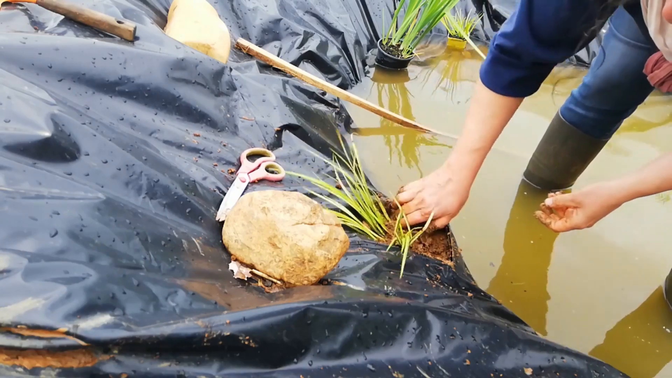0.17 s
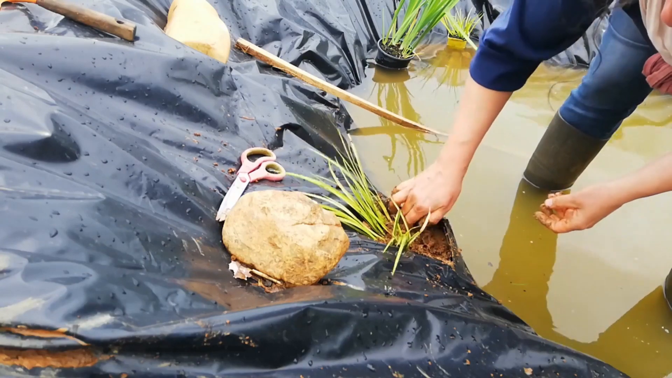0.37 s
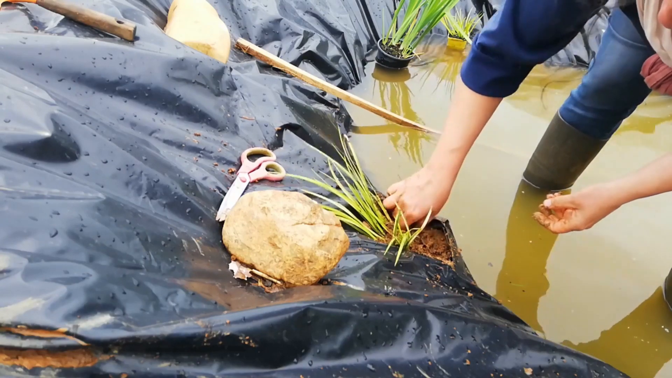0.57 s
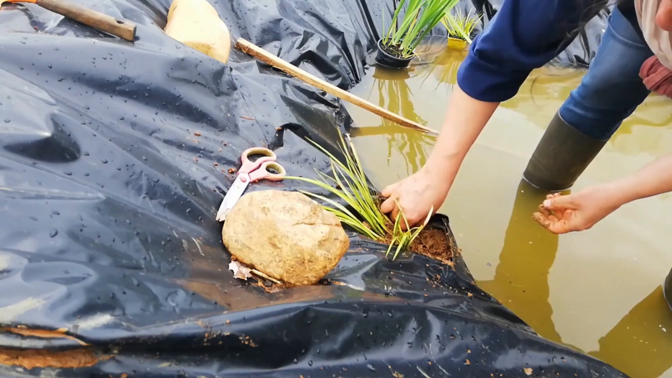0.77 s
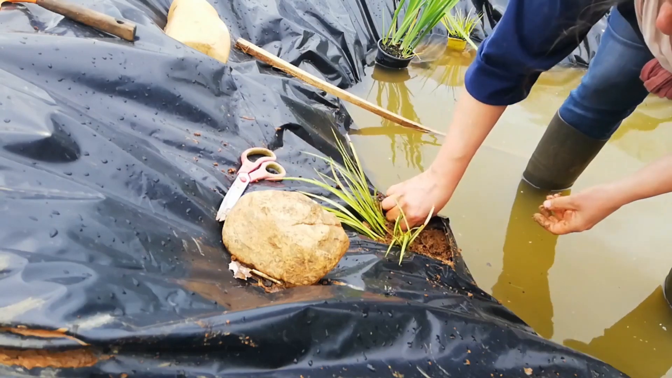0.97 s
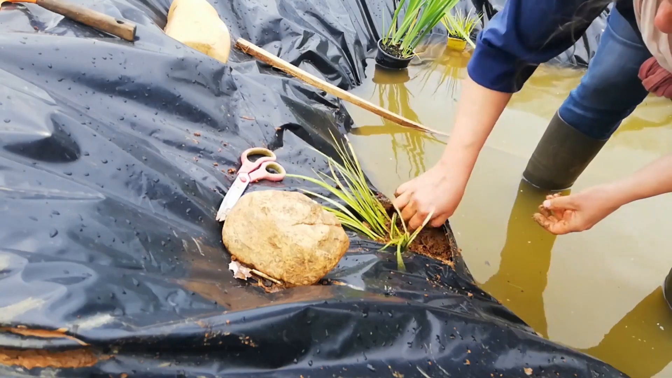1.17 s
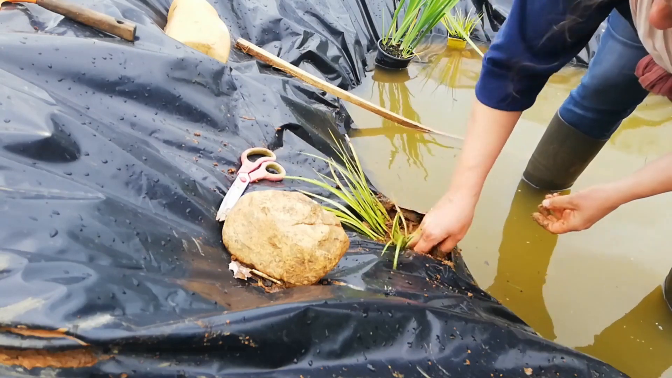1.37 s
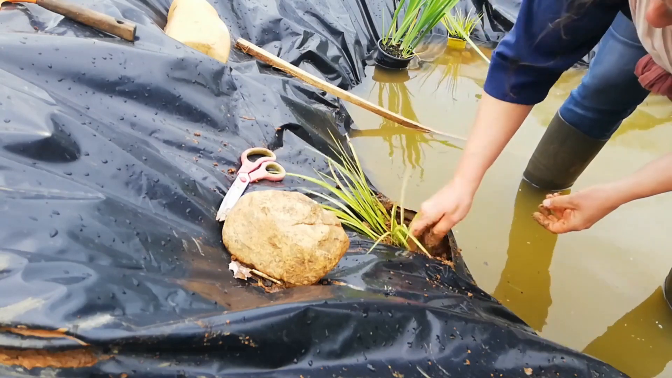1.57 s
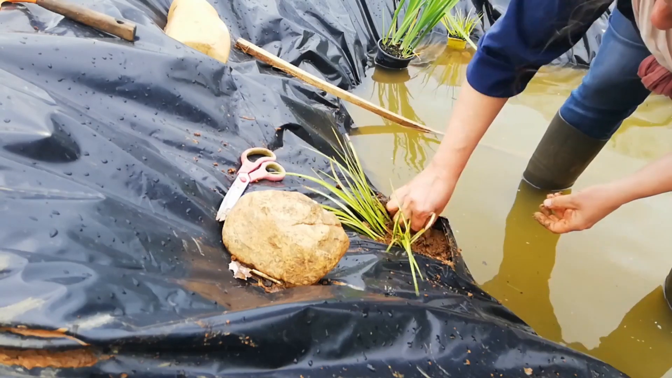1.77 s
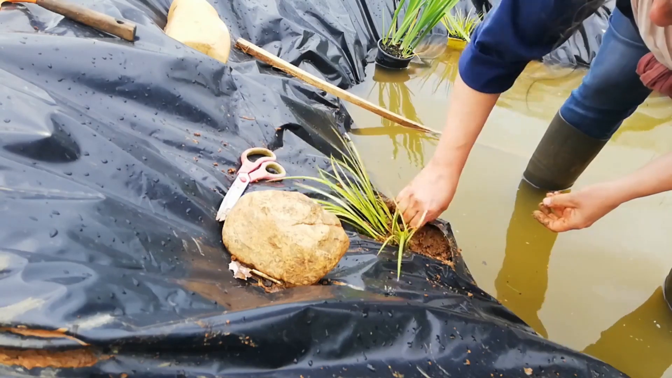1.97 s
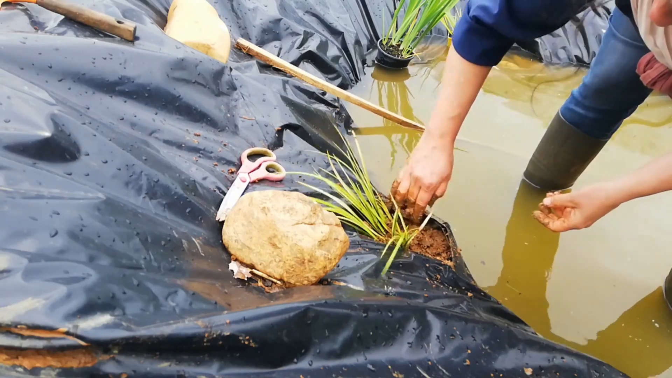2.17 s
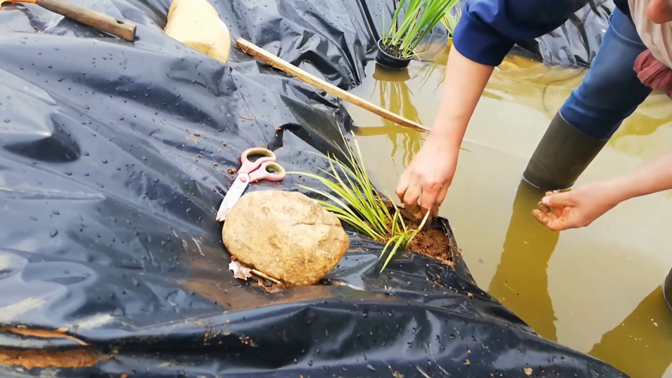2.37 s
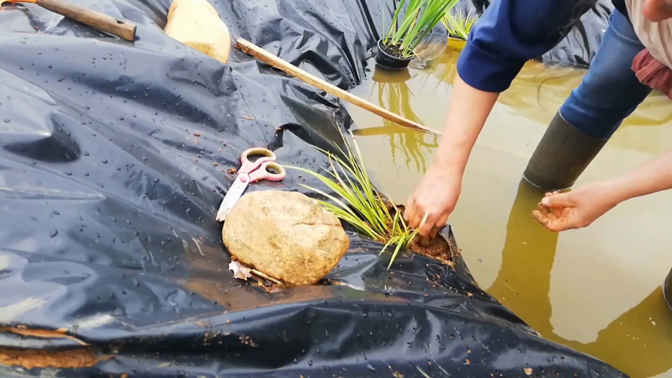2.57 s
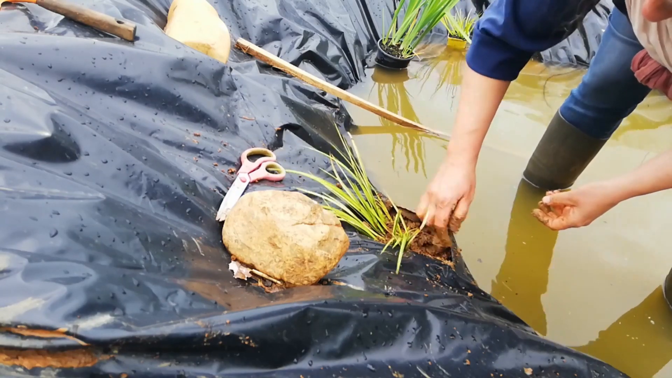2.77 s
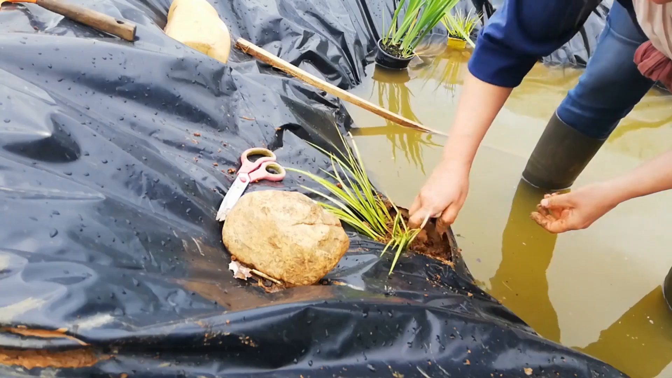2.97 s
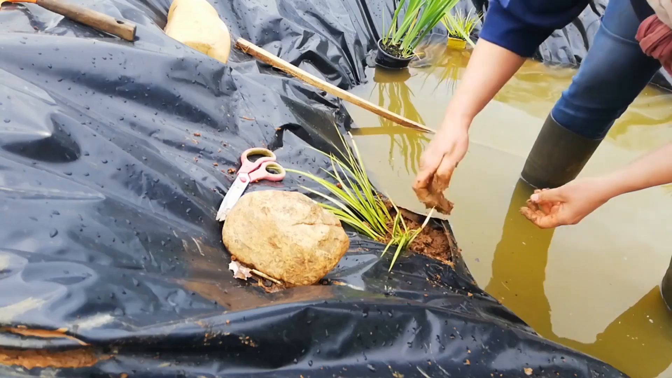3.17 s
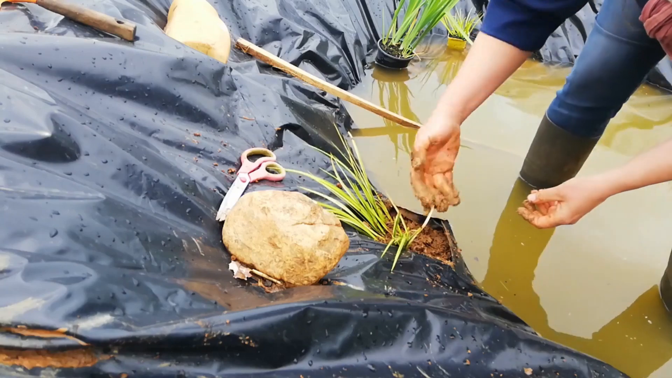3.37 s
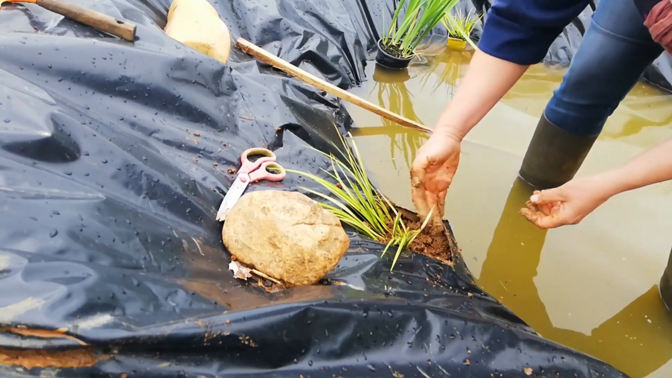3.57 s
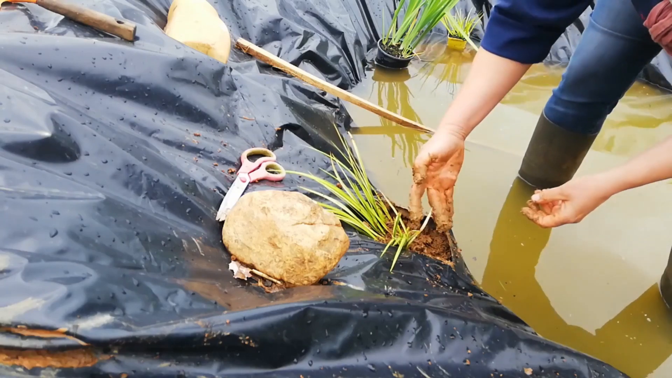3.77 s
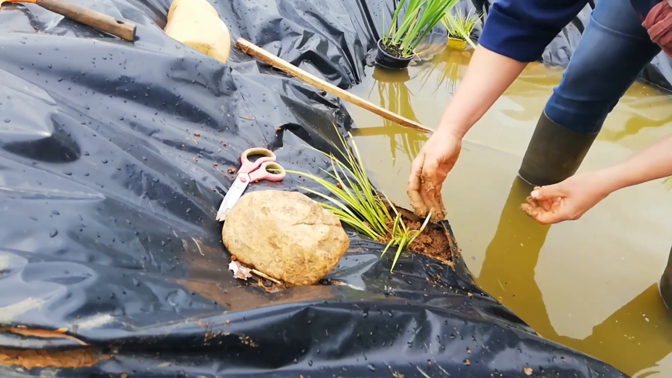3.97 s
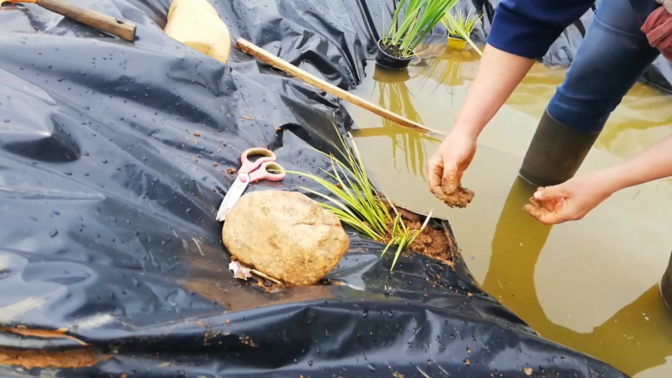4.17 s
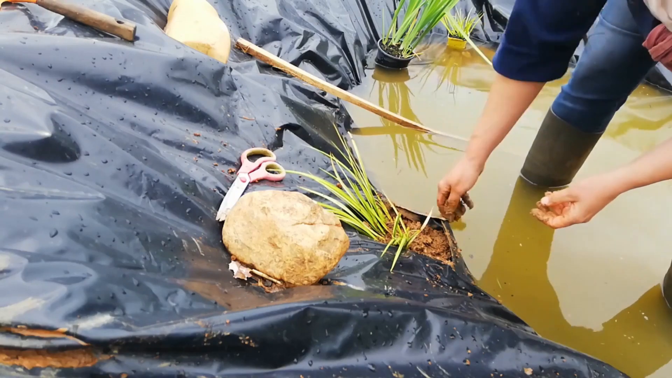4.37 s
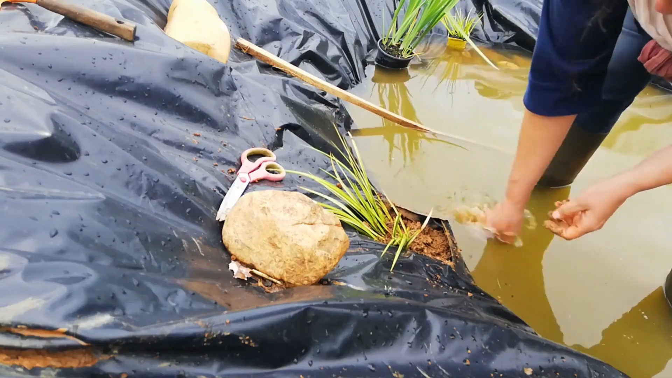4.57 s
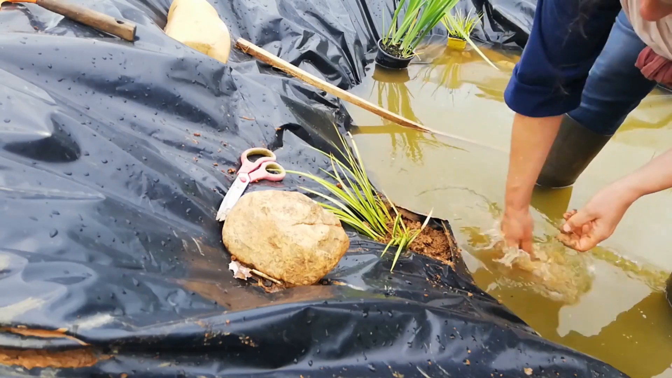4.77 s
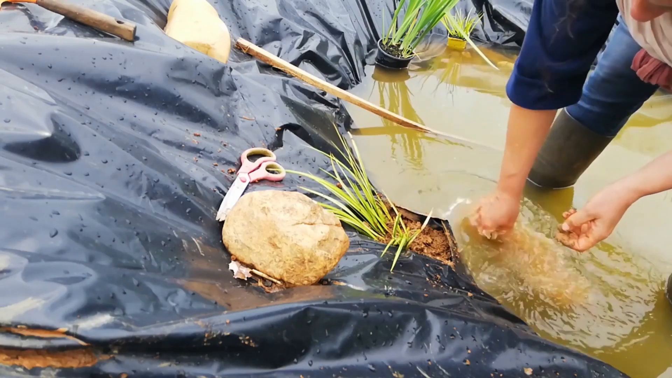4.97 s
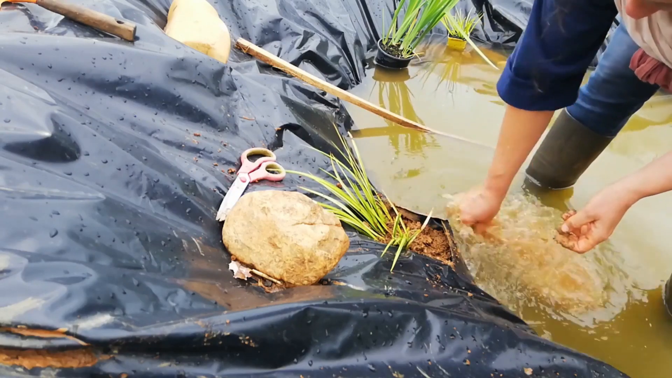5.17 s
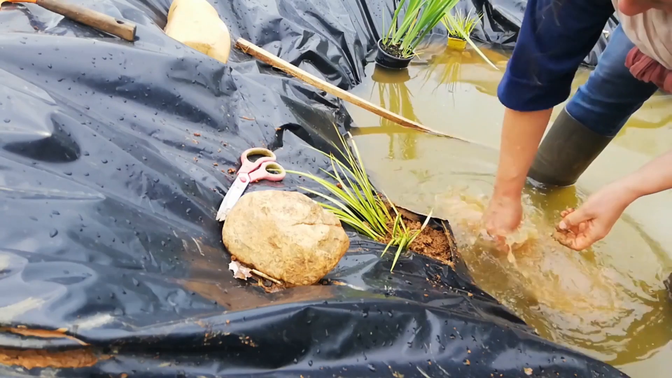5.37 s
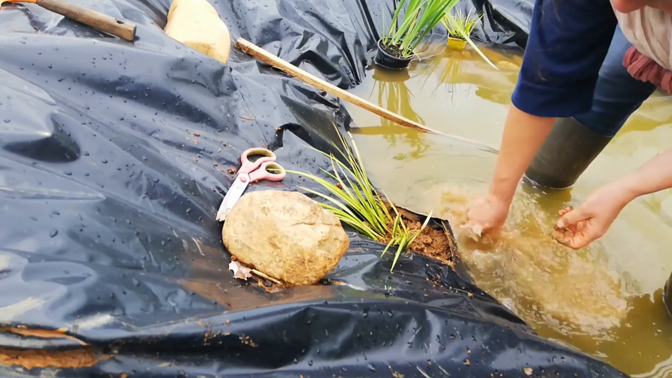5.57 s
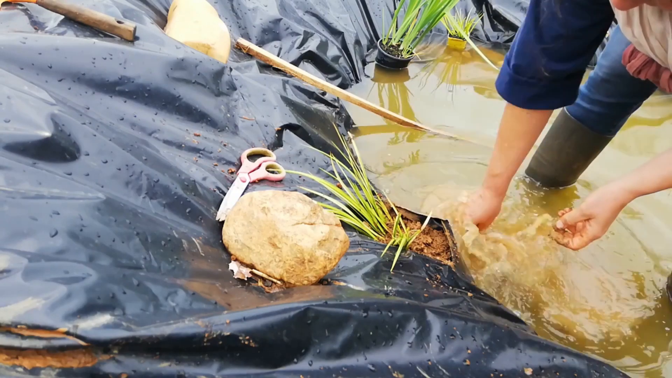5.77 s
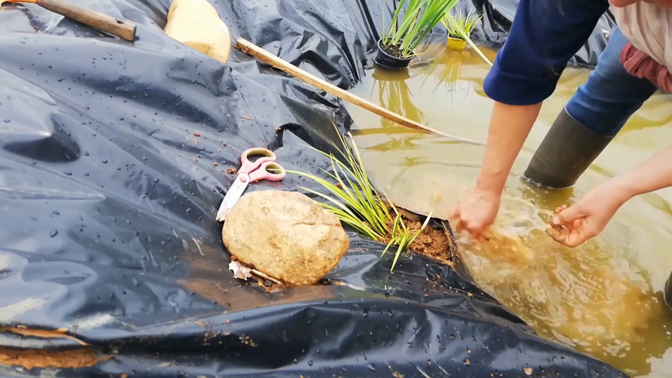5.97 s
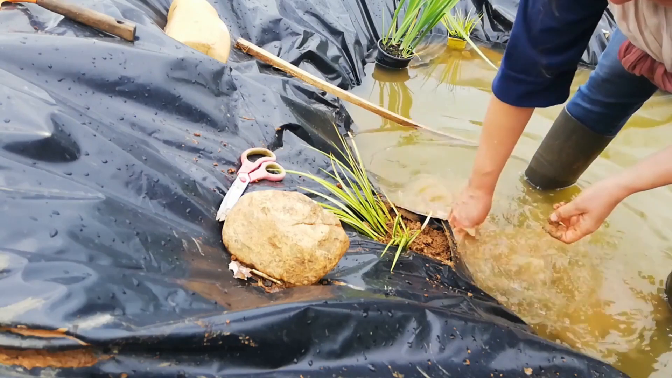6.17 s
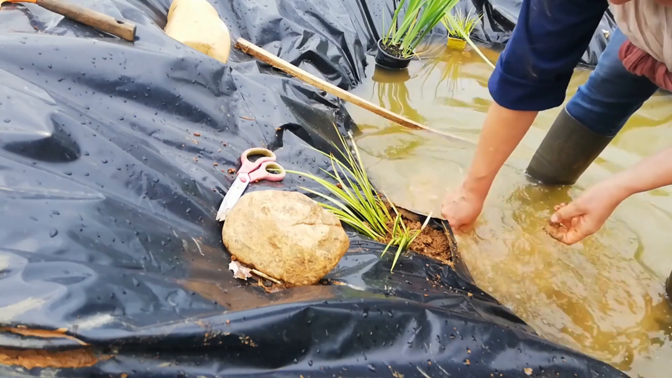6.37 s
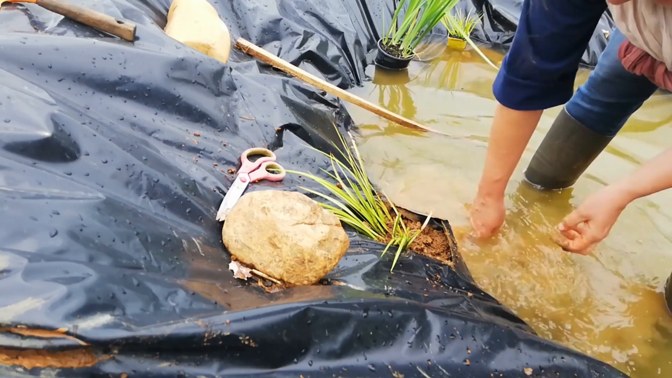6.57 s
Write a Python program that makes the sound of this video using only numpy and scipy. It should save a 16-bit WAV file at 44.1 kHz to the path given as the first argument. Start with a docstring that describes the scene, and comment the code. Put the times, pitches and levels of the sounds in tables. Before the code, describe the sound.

Close outdoor sound at a garden pond edge. A hand quietly presses gritty soil around a plant, with soft pats and tiny ticks, then sweeps it in brighter strokes. After a short lull with faint distant bird whistles, the hand enters the water and swishes back and forth, much louder, with gurgling bubbles, plops and crackling spray that ease at the end.

```python
"""A hand swishes itself clean in a plastic-lined garden pond: strokes drive noise, ringing bubbles and spray.
Before that it presses, then sweeps, gritty soil around a plant at the edge: granular noise in short swells.
Ticks and pats are short noise bursts; the lined banks add a brief noise-like echo.
Behind lie faint gliding whistles of birds, a low distant hum and drone, still air and puffs of wind."""
import sys
import numpy as np
from scipy import signal
from scipy.io import wavfile
from scipy.ndimage import uniform_filter1d

SR = 44100
rng = np.random.default_rng(int(sys.argv[2]) if len(sys.argv) > 2 else 0)


def pcm_store(signal):
    """Save signal as 16-bit PCM."""
    levels = np.round(np.clip(np.atleast_2d(signal), -1, 1) * 32767)
    wavfile.write(sys.argv[1], SR, levels.astype(np.int16).T)


N = 292383
TIME_S = np.arange(N) / SR
DIP_S = 4.4  # the hand enters the water


def from_db(db):
    """Decibels to amplitude gain."""
    return 10 ** (np.asarray(db) / 20)


def rms_one(x):
    """Scale to unit power."""
    return x / np.sqrt(np.mean(x ** 2) + 1e-20)


def gains(rows):
    """A gain curve per dB column, linear in dB between rows and -120 dB outside them."""
    times_s, *columns = np.transpose(rows)
    times_s = np.sort(times_s)
    return [from_db(np.interp(TIME_S, times_s, c, left=-120, right=-120)) for c in columns]


def swells(rows, roundness):
    """A gain curve per dB column: events rise and fall by 20 dB in their two times; powers add."""
    t, power = np.arange(0, N, 20) / SR, 0
    for peak_s, rise_s, fall_s, *levels_db in rows:
        away = np.abs((t - peak_s) / np.where(t < peak_s, rise_s, fall_s))
        # roundness 1 is pointed in dB, 2 a bell
        event_db = np.array(levels_db)[:, None] - 20 * away ** roundness
        power = power + from_db(event_db) ** 2
    return [np.interp(TIME_S, t, np.sqrt(p)) for p in power]


def at_hz(points, hz, axis=1):
    """Read one column of a table on a log-frequency axis."""
    columns = np.transpose(points)
    return np.interp(np.log(hz), np.log(columns[0]), columns[axis])


def drift(knots_per_s):
    """Slow random curve of rms 1, straight between Gaussian knots."""
    knots = rng.standard_normal(4000)
    return rms_one(np.interp(TIME_S * knots_per_s, np.arange(len(knots)), knots))


def band(x, low_hz, high_hz, order=2):
    """Causal band-pass."""
    edges_hz = [low_hz, min(high_hz, SR / 2 - 100)]
    return signal.sosfilt(signal.butter(order, edges_hz, "band", fs=SR, output="sos"), x + 1e-18)


def add(out, s, sound):
    """Mix a sound in at s seconds, cut at the end."""
    at = max(round(s * SR), 0)
    part = sound[:max(N - at, 0)]
    out[at:at + len(part)] += part


def coloured(spectrum, grain=1, patchy_db=0, low_hz=20):
    """Noise scaled by a grain pattern, shaped in bands that flicker by patchy_db; rms 1."""
    edges_hz = np.geomspace(18, 17000, 37)
    white, out = rng.standard_normal((2, N)) * grain, 0
    for k, (low, high) in enumerate(zip(edges_hz, edges_hz[1:])):
        hz = np.sqrt(low * high)
        if max(low_hz, spectrum[0][0]) <= hz <= spectrum[-1][0]:
            # neighbouring bands take different noise
            gain = from_db(at_hz(spectrum, hz) + patchy_db * drift(70))
            out = out + band(white[k % 2], low, high) * gain
    return rms_one(out)


def grains(per_s, spread_db, smooth):
    """Amplitude of random tiny impacts of very unequal size, power evened out, over a smooth floor."""
    hits = rng.random(N) < per_s / SR
    sizes = hits * from_db(spread_db * np.minimum(rng.exponential(1, N), 4.5))
    local_power = np.abs(uniform_filter1d(sizes ** 2, size=2200))
    power = sizes ** 2 / (local_power + 1e-9)
    return np.sqrt(power + smooth ** 2)


def bubble(hz, t60_s, glide):
    """A damped sine whose pitch glides as the bubble's depth changes: by 2 * glide of hz over t60."""
    t = np.arange(int(abs(t60_s) * SR) + 2) / SR
    phase = 2 * np.pi * hz * (t + glide * t ** 2 / t60_s)
    onset = 1 - np.exp(-t * hz * 2)
    return np.sin(phase) * from_db(-60 * t / t60_s) * onset


def burst(hz, t60_s, width, count=4000):
    """A short decaying noise crack, band-passed from hz / (1 + width) to hz * (1 + width); peak 1."""
    decay = np.exp(-np.log(1000) * np.arange(count) / SR / t60_s)
    ratio = 1 + abs(width)
    crack = band(rng.standard_normal(count) * decay, hz / ratio, hz * ratio)
    return crack / np.abs(crack).max()


def water():
    """Each stroke churns bubbles under, tears the surface and throws a crackling spray."""
    # hand strokes: peak t/s, rise/s, fall/s, relative churn level/dB, relative spray level/dB
    strokes = [(4.448, 0.026, 0.12, -74, -53.5), (4.585, 0.071, 0.1, -53, -47.5),
               (4.715, 0.14, 0.22, -44.5, -47.5), (4.79, 0.062, 0.16, -37.5, -38.5),
               (4.91, 0.25, 0.24, -41, -43.5), (5.01, 0.05, 0.1, -39, -35.5), (5.21, 0.22, .13, -46, -42),
               (5.305, 0.041, 0.09, -49, -41), (5.414, 0.021, 0.023, -49.5, -42),
               (5.495, 0.084, 0.13, -37, -42.5), (5.585, 0.22, 0.29, -50, -45),
               (5.8, 0.11, 0.11, -42.5, -45), (5.87, 0.075, .12, -44, -38),
               (6.02, 0.039, 0.099, -42, -40.5), (6.12, 0.059, 0.1, -43.5, -38.5),
               (6.3, 0.11, 0.25, -63.5, -55), (6.42, 0.11, 0.33, -80, -62), (6.625, 0.042, .1, -53, -54.5)]
    # spectrum of torn water: f/Hz, relative density/(dB per Hz)
    splash = [(150, -50), (250, -18), (393, -23.5), (576, -12), (788, -15), (955, 0), (1380, 2.5),
              (2130, -10), (2810, -13.5), (3710, -11.5), (5250, -12.5), (8400, -6.5), (11700, -9),
              (16000, -31)]
    churned, sprayed = swells(strokes, roundness=1.136)
    torn = coloured(splash, grains(per_s=2800, spread_db=4.0, smooth=0.21), patchy_db=1.5)
    wash = band(torn, 560, 3300)
    # hard strokes go deeper and slosh low
    slosh = rms_one(band(torn, 248, 590)) * np.sqrt(churned / churned.max())
    # drops fall back in clumps
    clumps = from_db(2.0 * drift(130))
    drops = clumps * grains(per_s=2600, spread_db=3.5, smooth=0.63)
    spray = coloured(splash, drops, patchy_db=4.0, low_hz=2100)
    gurgle = from_db(-3.0) * churn() + from_db(-0.5) * wash + from_db(-10.5) * slosh
    return churned * gurgle + from_db(1) * sprayed * spray


def churn(count=950):
    """A cloud of small bubbles after the dip, each ringing for 15 to 45 cycles; power evened out."""
    # bubble sizes: f/Hz, relative level/dB
    sizes = [(450, -15), (600, -11.5), (750, -7), (1000, 3.5), (1450, 4.5), (1900, 1.5), (3200, 1)]
    low_hz, high_hz = sizes[0][0], sizes[-1][0]
    out = np.zeros(N)
    for when, size, loud, life, rise in rng.random((count, 5)):
        hz = low_hz * (high_hz / low_hz) ** size
        ring = bubble(hz, t60_s=(.5 + life) * 30 / hz, glide=0.444 * rise - .12)
        level_db = at_hz(sizes, hz) + 13.2 * loud
        add(out, DIP_S + when * (N / SR - DIP_S), from_db(level_db) * ring)
    power = np.abs(uniform_filter1d(out ** 2, size=1800))
    return out / np.sqrt(power + 0.0095 * power.max())


def plops(level_db=-0.6, count=2):
    """Large air pockets close and ring, low ones longer; each sheds weaker bubbles."""
    # pockets: t/s, relative level/dB, initial f/Hz, glide (half the pitch change as a share of f)
    pockets = [(4.4597, -49, 1660, .1), (4.5128, -45, 2330, .1), (4.5913, -36.5, 2600, 0.03),
               (4.5383, -40.5, 1110, -0.26), (4.5753, -34.5, 1420, .1), (4.6025, -39.5, 1920, 0.1),
               (4.65, -33, 1106, 0.07), (4.7072, -27.5, 1012, -0.12), (4.706, -30, 1940, 0.03),
               (4.7525, -34, 1280, 0.3), (4.7822, -30.5, 868, 0), (4.788, -29, 2670, .1),
               (4.8163, -34, 1410, 0.05), (4.833, -28, 1560, -.08), (4.9024, -30, 1340, 0.13),
               (4.9175, -33.5, 1230, .1), (4.9253, -31.5, 994, 0), (4.9642, -28.5, 1334, .03),
               (4.973, -35, 717, 0), (5.002, -26.5, 1100, .1), (5.0319, -26, 1395, 0.15),
               (5.0532, -35.5, 1122, 0), (5.1456, -32, 1438, .03), (5.189, -36.5, 2000, .05),
               (5.2298, -25.5, 1477, 0.13), (5.2638, -35.5, 964, 0.12), (5.3155, -34.5, 1420, -0.08),
               (5.358, -39.5, 1220, .13), (5.497, -28.5, 1380, .15), (5.5955, -35.5, 1365, -.04),
               (5.6554, -29.5, 2760, -.02), (5.733, -32.5, 565, 0.1), (5.741, -33, 1460, 0.5),
               (5.772, -38, 520, 0.45), (5.771, -31, 1400, .1), (5.8028, -28, 1104, -0.14),
               (5.816, -31, 854, 0.1), (5.828, -27.5, 1300, .06), (5.845, -36, 1160, -0.22),
               (5.8632, -27, 1175, 0.06), (5.8723, -33, 1800, .14), (5.9067, -30, 2310, .05),
               (5.9952, -32.5, 2420, 0.35), (6.0086, -31.5, 808, 0.65), (6.0297, -34.5, 1040, 0.5),
               (6.063, -30, 996, -0.06), (6.079, -45.5, 575, .13), (6.104, -39, 1280, -0.1),
               (6.1252, -33, 2370, 0), (6.1955, -37.5, 1265, 0.2), (6.247, -38, 1035, .16),
               (6.2675, -37.5, 1230, 0.08), (6.3132, -44, 1560, 0.5), (6.3635, -35, 3450, -0),
               (6.5748, -36, 1620, 0.05), (6.6121, -29, 2044, 0), (6.6232, -36, 1140, -0.35)]
    ring_cycles = 41  # periods of the initial pitch in a 60 dB decay
    shed_db, latest_s, spread_octaves = -8, .016, 0.507
    out = np.zeros(N)
    for (s, db, hz, glide), shed in zip(pockets, rng.random((len(pockets), count, 2))):
        add(out, s, from_db(db + level_db) * bubble(hz, ring_cycles / hz, glide))
        for late, size in shed:
            shed_hz = hz * 2 ** (spread_octaves * (2 * size - .8))
            ring = bubble(shed_hz, .6 * ring_cycles / shed_hz, glide)
            add(out, s + late * latest_s, from_db(db + shed_db) * ring)
    return out


def ticks(level_db=-0.5, t60_s=0.015):
    """Grit, then drops, tick brightly: grit with a brief narrow ring, drops with a broader snap."""
    # ticks: t/s, relative peak level/dB, centre f/Hz
    tick_rows = [(.085, -36.5, 9500), (0.3255, -47, 4400), (.708, -39.5, 8900), (1.48, -57, 4950),
                 (1.83, -45, 6600), (2.6919, -39, 10050), (2.7096, -38, 12100), (2.7337, -41, 7700),
                 (3.455, -40, 9550), (3.4556, -45.5, 5670), (3.6713, -43, 3650), (3.6713, -43, 9000),
                 (4.433, -39, 8980), (4.448, -31, 9450), (4.533, -29.5, 7500), (4.57, -31.5, 10040),
                 (4.6382, -32.5, 10300), (4.7144, -33, 6720), (4.75, -32, 8470), (4.794, -23.5, 8200),
                 (4.8997, -25, 11700), (4.95, -29, 8480), (5.0009, -23, 8600), (5.022, -19.5, 11400),
                 (5.0818, -28, 3600), (5.0813, -17, 9500), (5.3043, -32, 8950), (5.4147, -28.5, 6940),
                 (5.4482, -30, 10800), (5.4908, -31, 6150), (5.524, -30, 8100), (5.5619, -23.5, 7500),
                 (5.583, -20.5, 11500), (5.6095, -32.5, 3370), (5.7067, -37, 3500), (5.795, -22, 8100),
                 (5.9417, -22.5, 10830), (5.9607, -32, 5700), (6.029, -29.5, 8050), (6.115, -26, 6360),
                 (6.266, -23, 6820), (6.348, -24, 9200)]
    grit_width, drop_width = 0.093, 0.23
    out = np.zeros(N)
    for s, db, hz in tick_rows:
        width = drop_width if s > DIP_S else grit_width
        add(out, s, from_db(db + level_db) * burst(hz, t60_s, width))
    return out


def pats(level_db=0.5):
    """The hand pats and scuffs wet soil, then water: short broad noise bursts."""
    # pats: t/s, relative peak level/dB, centre f/Hz, t60/s
    pat_rows = [(.025, -49.5, 870, 0.16), (.155, -47.5, 850, 0.12), (.16, -41.5, 4500, 0.13),
                (.263, -52, 323, 0.025), (.266, -50, 770, 0.022), (0.614, -58, 1300, 0.021),
                (.718, -53.5, 786, .03), (.985, -49.5, 1120, 0.024), (1.036, -50.5, 300, 0.036),
                (1.092, -52, 1210, 0.027), (1.182, -48, 3050, 0.025), (1.539, -49, 1250, 0.02),
                (2.014, -49, 1060, .04), (2.66, -50, 1300, .025), (2.865, -47.5, 1100, 0.027),
                (2.891, -44.5, 1080, 0.028), (3.516, -48.5, 735, 0.024), (3.537, -52.5, 2400, .02),
                (4.602, -47.5, 483, .03), (4.648, -46, 563, 0.075), (4.783, -28, 1210, 0.024),
                (4.795, -39, 353, 0.071), (4.899, -38, 1490, .02), (5.415, -42, 520, 0.074),
                (5.56, -37.5, 800, 0.036), (5.655, -35, 1350, 0.017), (6.3457, -34.5, 2100, 0.011)]
    out = np.zeros(N)
    for s, db, hz, t60_s in pat_rows:
        add(out, s, from_db(db + level_db) * burst(hz, t60_s, width=0.38))
    return out


def soil():
    """Grit and leaves crackle finely under the fingers: pressed down, then swept in brighter strokes."""
    # finger rubs: peak t/s, rise/s, fall/s, relative dull scrape level/dB, relative gritty hiss level/dB
    rubs = [(.04, .05, 0.12, -57.5, -51), (.162, 0.056, 0.12, -57, -50), (.23, 0.05, 0.29, -68, -60.5),
            (.5, 0.11, 0.089, -69, -63), (.63, 0.19, 0.47, -70, -63), (.93, 0.067, .07, -63, -56),
            (1.07, .15, .08, -69.5, -61.5), (1.17, 0.048, 0.033, -64, -59), (1.39, 0.038, .12, -71, -59),
            (1.465, 0.051, 0.098, -60, -53.5), (1.565, 0.1, .1, -71, -56), (1.83, 0.14, 0.14, -81, -62.5),
            (2.015, 0.04, 0.044, -58.5, -50), (2.085, 0.053, 0.07, -68.5, -57.5),
            (2.235, 0.057, 0.077, -59.5, -45.5), (2.29, 0.057, 0.036, -57.5, -48.5),
            (2.615, 0.061, .1, -58.5, -46), (2.868, 0.0091, .025, -57, -52),
            (2.896, 0.016, 0.025, -58, -47), (2.932, 0.038, 0.054, -58.5, -44)]
    # spectra of the two actions: f/Hz, relative density/(dB per Hz)
    press_spectrum = [(240, -11), (400, -10), (626, -23.5), (719, -12.5), (852, -11.5), (1010, -2),
                      (1790, -11.5), (3070, -5), (4050, -9.5), (4510, -2.5), (6850, -7.5), (9760, 3.5),
                      (12100, -11), (16000, -14)]
    sweep_spectrum = [(240, -29), (400, -9.5), (562, -24), (697, -14.5), (893, -7.5), (1230, -3.5),
                      (2180, -12.5), (2840, -3.5), (3690, -6.5), (4650, -10.5), (9610, 2), (12100, -9),
                      (15300, -12), (16000, -21)]
    scrape, hiss = swells(rubs, roundness=1.57)
    swept = np.clip((TIME_S - 1.7) / 0.57, 0, 1)
    press_grains = grains(per_s=2200, spread_db=2.5, smooth=0.75)
    pressing = coloured(press_spectrum, press_grains, patchy_db=2.0)
    sweep_grains = grains(per_s=9000, spread_db=4.5, smooth=0.82)
    sweeping = coloured(sweep_spectrum, sweep_grains, patchy_db=2.0)
    # the fingers catch and slip
    catch = from_db(1.46 * drift(90))
    grit = (np.sqrt(1 - swept) * pressing + np.sqrt(swept) * sweeping) * catch
    dull = rms_one(band(grit, 260, 1820, order=3))
    bright = rms_one(band(grit, 2130, 15500, order=3))
    return from_db(-1.0) * scrape * dull + hiss * bright


def banks(x, t60_s, level_db, count=9000):
    """The lined banks return a brief, weak echo: decaying noise, separate for each channel."""
    t = np.arange(count) / SR
    echo = rng.standard_normal((2, count)) * np.exp(-np.log(1000) * t / t60_s) * (t > .003)
    echo /= np.sqrt(np.sum(echo ** 2, axis=1, keepdims=True))
    return from_db(level_db) * signal.fftconvolve(x, echo, axes=1)[:, :N]


def birds(waver=0.0072, flutter_db=2.0):
    """Far birds: thin gliding sines with wavering pitch and fluttering level."""
    # whistles: t/s, length/s, start f/Hz, end f/Hz, relative level/dB
    whistles = [(2.41, .08, 8000, 7900, -76), (2.7, 0.15, 3380, 3200, -75), (3.202, 0.12, 3080, 2980, -77),
                (3.27, 0.13, 4500, 4400, -80), (3.58, 0.07, 3520, 3840, -68.5),
                (3.637, 0.11, 3690, 3670, -69), (3.712, 0.056, 4450, 4480, -61),
                (3.815, 0.047, 2890, 2800, -72), (3.936, 0.041, 3620, 3460, -72),
                (3.959, 0.11, 4440, 4410, -67), (4.18, 0.12, 3010, 2980, -76)]
    out, wobble = np.zeros(N), drift(160)
    for s, length_s, start_hz, end_hz, db in whistles:
        n = int(length_s * SR)
        hz = np.linspace(start_hz, end_hz, n) * (1 + waver * wobble[int(s * SR):][:n])
        tone = np.sin(2 * np.pi * np.cumsum(hz) / SR)
        add(out, s, from_db(db) * tone * signal.windows.tukey(n, .6))
    return out * from_db(flutter_db * drift(110))


def garden():
    """Still air as shaped noise, distant phase-wavering hum, narrow-band drone and wind puffs."""
    # wind puffs on the microphone: peak t/s, rise and fall/s, relative level/dB
    puffs = [(.05, .12, -56), (1.75, 0.46, -62.5), (2.92, 0.2, -47), (3.22, 0.13, -47), (5.91, 0.15, -48.5),
             (6.23, .1, -44), (6.43, 0.056, -48), (6.6, 0.14, -54)]
    # distant low drone: t/s, level/dB
    drone_levels = [(0, -75.5), (2.4, -84.5), (2.9, -66), (3.2, -68.5), (4.0, -70), (4.3, -65), (4.6, -58),
                    (4.8, -68), (5.5, -79), (6.63, -62)]
    # distant hum: f/Hz, rms level/dB
    hum_tones = [(129.2, -78.5), (213.5, -73.5)]
    # spectra of still air and wind: f/Hz, relative density/(dB per Hz)
    air_spectrum = [(20, -9), (70, -5), (130, -7), (215, -14), (320, -26), (550, -32), (760, -26),
                    (1100, -28), (2400, -31), (4000, -31), (6400, -35), (9500, -30), (13000, -36),
                    (16000, -42)]
    gust_spectrum = [(20, 5.5), (45, -9), (80, -10), (160, -34.5), (400, -42)]
    gust, = swells([(s, length_s, length_s, db) for s, length_s, db in puffs], roundness=1.4)
    swell, = gains(drone_levels)
    hum = np.zeros(N)
    for hz, db in hum_tones:
        hum += from_db(db) * np.sqrt(2) * np.sin(2 * np.pi * hz * TIME_S + drift(14))
    drone = swell * rms_one(band(rng.standard_normal(N), 108, 148.0))
    air = from_db(-61.5) * coloured(air_spectrum, patchy_db=1.5)
    wind = from_db(-2.0) * gust * coloured(gust_spectrum)
    return air + hum + drone + wind


def ports(x, place, size=256):
    """Two microphone ports differ in level and phase; restless water and foliage scatter the rest."""
    hz, _, mid = signal.stft(x, SR, nperseg=size)
    balance_db, lead_rad, likeness = (at_hz(place, hz[:, None] + 1, axis=k) for k in range(1, 4))
    # port powers and their cross term
    left, right = from_db(balance_db), from_db(-balance_db)
    shared = np.clip(likeness, 0, .99) * np.exp(1j * lead_rad)
    # port difference: a part that follows their sum and a part with scattered phase
    sum_power = left + right + 2 * shared.real
    direct = (left - right + 2j * shared.imag) / sum_power
    scattered = np.abs((left + right - 2 * shared.real) / sum_power - np.abs(direct) ** 2)
    turns = np.exp(2j * np.pi * rng.random(mid.shape))
    side_bins = mid * (direct + np.sqrt(2 * scattered) * turns)
    side = signal.istft(side_bins, SR, nperseg=size)[1][:N]
    return np.array([x + side, x - side])


def scene():
    """Soil work, then washing, with their echo, over the garden's background."""
    # paths to the two ports: f/Hz, left-right/dB, left lead/rad, likeness/0-1
    from_water = [(200, 0, -.3, .85), (450, -3, -1.6, .85), (720, -12, -1.9, .85), (900, -5, -.3, .92),
                  (1250, -1.5, -.8, .9), (1520, 5.5, -1, .85), (2000, 4.5, -1.6, .75), (2400, -5, -2, .65),
                  (2900, -6.5, -2, .5), (4300, -1, -2.7, .45), (6000, -2, -1.5, .1), (7200, 0, 0, .6),
                  (9700, 2, 0, .35), (12000, -8, 0, .3)]
    from_soil = [(200, 0, 0, .85), (500, -1, -1.6, .2), (950, -5, .4, .6), (1600, 2, -.1, .7),
                 (2500, -3.5, -.6, .45), (3600, .5, -.4, .4), (5200, -3, -.8, .35), (7200, 2, 0, .85),
                 (10000, .5, 0, .8), (12500, -7, 0, .65)]
    from_afar = [(60, 0, 0, .99), (170, 0, 0, .96), (260, 0, -.2, .8), (400, -1.5, -1.5, .4),
                 (700, -4, -2, .2), (1200, -.5, 0, .02), (6000, -1, 0, .1), (8000, 0, 0, .8),
                 (12500, -3, 0, .5)]
    touches = ticks() + pats()
    wet = TIME_S > DIP_S
    at_edge = ports(soil() + touches * ~wet, from_soil)
    in_pond = ports(water() + plops() + touches * wet, from_water)
    near = at_edge + in_pond
    far = ports(garden() + birds(), from_afar, size=2048)
    return near + banks(near, t60_s=0.2, level_db=-15.5) + far


def record(dry):
    """Steep elliptic low-pass at the top of the treble."""
    cutoff_hz = 15800
    return signal.sosfilt(signal.ellip(10, .1, 70, cutoff_hz, fs=SR, output="sos"), dry)


dry = scene()
out = record(dry)
pcm_store(out)
```